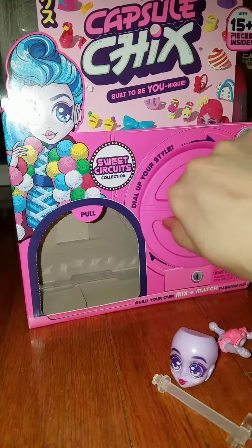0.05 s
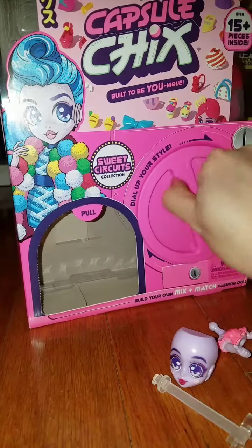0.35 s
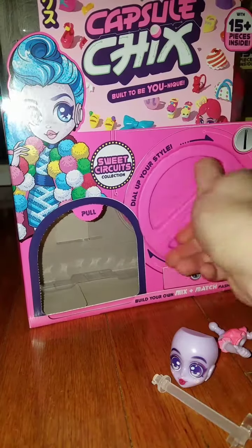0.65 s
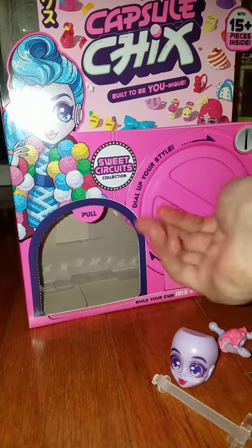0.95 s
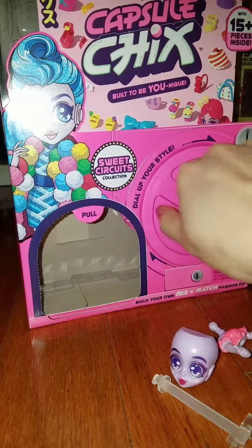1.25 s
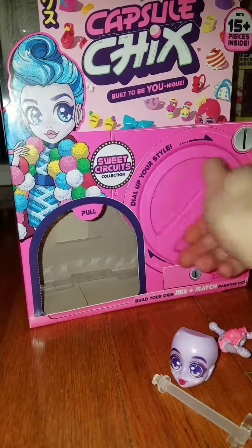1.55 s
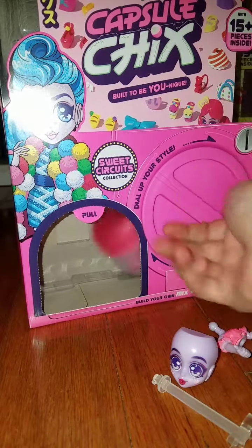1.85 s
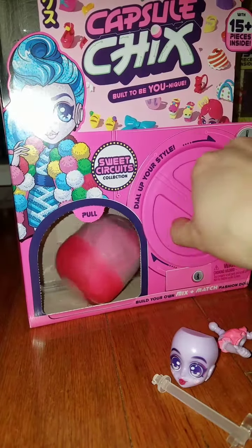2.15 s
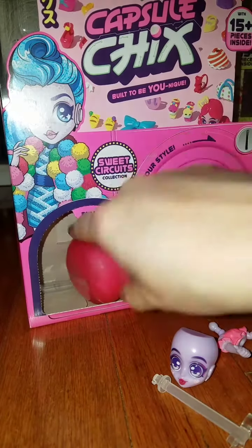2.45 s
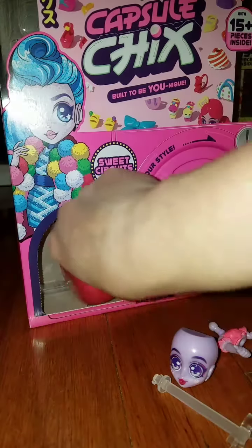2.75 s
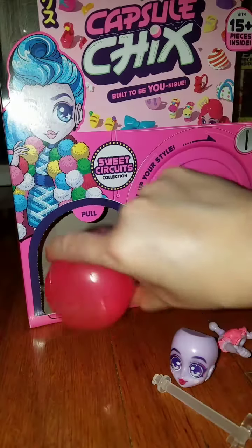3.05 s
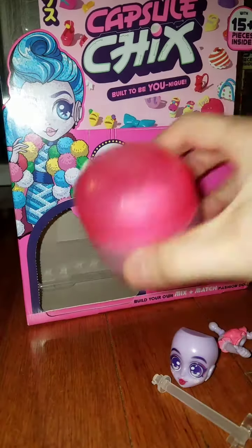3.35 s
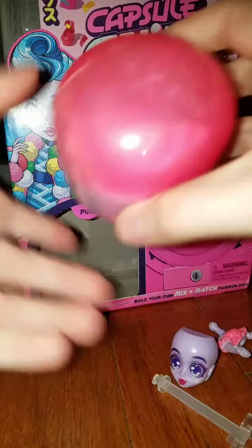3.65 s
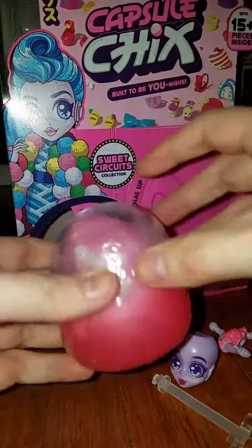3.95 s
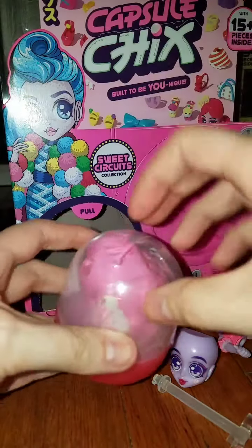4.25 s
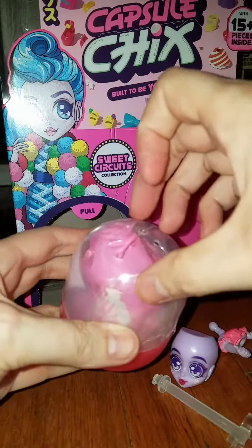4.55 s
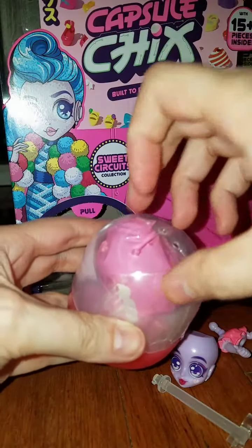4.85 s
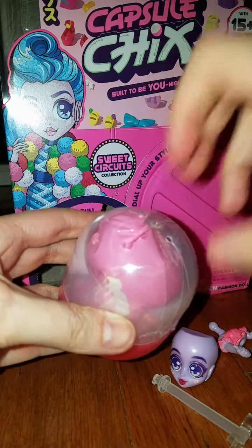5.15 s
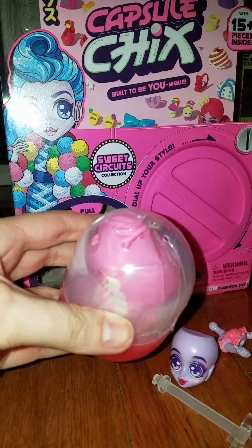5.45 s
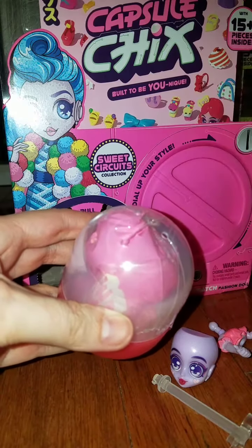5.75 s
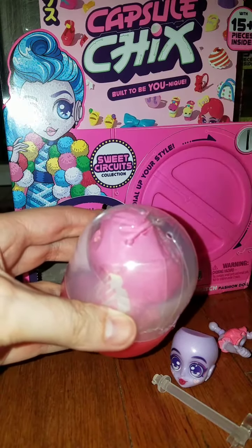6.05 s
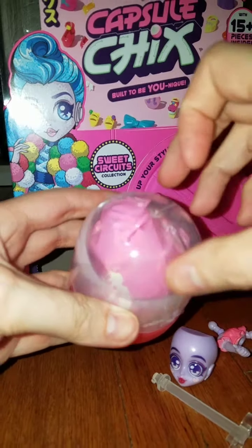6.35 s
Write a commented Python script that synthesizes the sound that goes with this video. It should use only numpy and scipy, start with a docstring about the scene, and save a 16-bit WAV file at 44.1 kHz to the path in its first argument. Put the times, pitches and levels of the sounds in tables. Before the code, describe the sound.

A plastic dial on a cardboard toy dispenser is twisted several times, scraping in its seat and ratcheting with uneven clicks. A capsule drops softly into the chute, then knocks and scrapes against the box as it is pulled out. Its shell ticks faintly under the fingers. Near the end something briefly bumps the microphone, which is close by in a small, quiet room.

```python
"""Toy capsule dispenser, close up

A plastic dial on a cardboard dispenser is twisted in four goes: it scrapes in its seat and ratchets
with uneven clicks. A capsule drops into the chute, knocks against the box as it is pulled out, and
ticks under the fingers. Small, quiet room; a close pair of microphones, the right one facing the
dial and brushed once near the end."""
import sys
import numpy as np
from scipy import signal
from scipy.fft import rfft, irfft, next_fast_len
from scipy.io import wavfile

SR = 44100
rng = np.random.default_rng(int(sys.argv[2]) if len(sys.argv) > 2 else 0)


def unload_wav(signal):
    """Save mono or channel-first audio to the path in sys.argv[1] as 16-bit WAV at rate SR, clipped to [-1, 1]."""
    wavfile.write(
        sys.argv[1],
        SR,
        np.round(np.clip(np.atleast_2d(signal).T, -1, 1) * 32767).astype(np.int16),
    )


N = 286631
TIME = np.arange(N) / SR

# ratchet clicks; weight is high when the whole box takes the blow:
# (time [s], strength [dB], weight [dB], sharpness [dB])
RATCHET_CLICKS = [(0.026, -33.5, -13.5, 2), (0.048, -36, -5, 0.5), (0.1975, -22, 2.5, 2.5),
                  (0.2195, -25.5, -3, 10), (0.264, -33.5, 0, -8), (0.316, -35.5, 6, 3.5),
                  (0.365, -26, -18, -6), (0.3866, -28.5, -19.5, 9), (0.4136, -21, -17, 5),
                  (0.439, -21, 1.5, -2.5), (0.607, -43, 6, 0), (0.6492, -19, 0, -6.5),
                  (0.691, -30, 3.5, -2), (0.895, -33, -8, -1.5), (1.0025, -30.5, -5.5, -2),
                  (1.03, -13, -3, -4.5), (1.1145, -19, -1.5, -3), (1.173, -33.5, 0, -7.5),
                  (1.265, -37.5, -11.5, 6.5), (1.398, -26.5, -9.5, 6.5), (1.5165, -27, -23, 0),
                  (1.526, -18.5, -6.5, 5), (1.564, -17, -20, 4), (1.607, -24.5, -13.5, -4),
                  (1.6392, -21, -17.5, -6), (1.6745, -21, -17.5, -3), (1.696, -19.5, -8.5, -6.5),
                  (1.702, -25, -9.5, -3), (1.789, -30, -8, -1)]
# the capsule against the box: (time [s], strength [dB], weight [dB], sharpness [dB])
CAPSULE_KNOCKS = [(1.886, -35.5, -15, -5), (1.973, -35, -6.5, 9), (2.213, -36, -5.5, 6.5),
                  (2.339, -42.5, -14, 7), (2.446, -19, -8, 0), (2.763, -43.5, -9.5, 3),
                  (2.883, -48.5, -3, 5.5), (2.9679, -21, 3, -1.5), (2.9965, -23, -11, 3),
                  (3.018, -22, 1, -2), (3.1663, -40, 4, -5), (3.188, -44.5, 7, -3), (3.241, -47, 6, -15)]
# scrapes of the dial, then the capsule: (middle [s], length [s], strength [dB], brightness [dB])
SCRAPE_STROKES = [(0.031, .1, -46.5, -1.5), (0.117, 0.074, -35.5, -1.5), (0.196, 0.078, -31.5, 3),
                  (0.369, 0.27, -38.5, 0.5), (0.558, 0.066, -32, 3), (0.782, 0.089, -31, 1),
                  (0.883, 0.14, -38, -1), (0.965, 0.044, -32, -4), (1.276, 0.051, -36, -0.5),
                  (1.396, 0.094, -30, 1.5), (1.564, 0.26, -30.5, 0.5), (1.779, .17, -33.5, -2.5),
                  (1.969, 0.14, -40, -0.5), (2.067, .035, -40, 2), (2.222, 0.15, -40.5, 0),
                  (2.399, 0.15, -36.5, -3.5), (2.49, .11, -38, -3), (2.648, 0.042, -38, 0),
                  (2.781, 0.23, -48, -1), (2.941, 0.082, -37, 2), (3.23, .14, -45, 0.5)]
# modes of box and dial: (frequency [Hz], level [dB], t60 [s])
BOX_MODES = [(106, -9.5, .09), (164.8, -4.5, .06), (225.6, 0.5, 0.089), (305, -3.5, 0.024),
             (435.6, -3.5, 0.067), (630, -0.5, 0.019), (770, -1, 0.025), (900, -2.5, 0.006),
             (1118, -1.5, 0.043), (1330, -2.5, 0.014), (1650, -2.5, 0.008), (2437, -.5, 0.013),
             (2586, -5.5, 0.015), (2929, -11.5, 0.037), (4970, -10.5, 0.011), (5340, -13, 0.0089),
             (7900, -12, 0.0064), (11800, -27, 0.011), (13100, -29.5, .005)]
# bounds of the five registers thump, knock, clack, snap and tick: (edge [Hz])
REGISTER_EDGES = [60, 330, 700, 1600, 5500, 16000]
# image at the microphone pair: (frequency [Hz], coherence [ratio], left minus right [dB])
MIC_PAIR = [(80, 0.91, -2.3), (180, 0.99, -1.5), (350, 0.8, -5.5), (560, 0.74, -1), (783, 0.78, -2),
            (1340, 0.086, -5.5), (2700, .12, -9.5), (5360, 0.028, -7), (9400, .03, -2), (13630, 0.25, -3.5)]


def from_db(db):
    """Decibels to gain."""
    return 10 ** (np.asarray(db) / 20)


def rms(x):
    """Root mean square."""
    return np.sqrt(np.mean(x ** 2) + 1e-20)


def at_hz(table, hz, column=1):
    """Reads a column of a table on a log-frequency axis."""
    table = np.array(table)
    return np.interp(np.log(hz), np.log(table[:, 0]), table[:, column])


def band(x, low, high):
    """Causal band-pass."""
    return signal.sosfilt(signal.butter(2, [low, high], "band", fs=SR, output="sos"), x)


def cut(x, hz, kind):
    """Gentle high- or low-pass."""
    return signal.sosfilt(signal.butter(2, hz, kind, fs=SR, output="sos"), x)


def drift(rate_hz):
    """A line wandering between random points of spread 1."""
    knots = rng.standard_normal(int(N / SR * rate_hz) + 2)
    return np.interp(TIME * rate_hz, np.arange(len(knots)), knots)


def swell(middle, half_length, t=TIME):
    """A stroke speeds up and slows down smoothly."""
    return np.exp(-np.minimum(((t - middle) / half_length) ** 2, 50) / 2)


def add(out, s, sound):
    """Mixes a sound in at time s."""
    at = max(round(s * SR), 0)
    out[:, at:at + sound.shape[1]] += sound[:, :N - at]


def noise(spectrum, lean=1, size=N):
    """Third-octave noise, alike at both microphones in the bass; lean pulls it to the right."""
    edges = np.geomspace(25, 17000, 29)
    white, out = rng.standard_normal((2, 2, size)), 0
    for k, (low, high) in enumerate(zip(edges, edges[1:])):
        hz = np.sqrt(low * high)
        if hz < spectrum[0][0] / 2:
            continue
        alike = at_hz(MIC_PAIR, hz)
        to_mics = np.sqrt([1 + alike, 1 - alike]) * [[1, 1], [1, -1]]   # mid, side to left, right
        pan_db = lean * at_hz(MIC_PAIR, hz, column=2) * np.array([[.5], [-.5]])
        out += (from_db(at_hz(spectrum, hz) + pan_db) * to_mics) @ band(white[k % 2], low, high)
    return out / rms(out.mean(0))


def recolour(x, gains_db):
    """Tone control with one gain for each register and smooth steps between them."""
    size = 2 * x.shape[1]
    hz = np.maximum(np.fft.rfftfreq(size, 1 / SR), 1)
    ranges = zip(REGISTER_EDGES, REGISTER_EDGES[1:])
    corners = np.ravel([(low * 2 ** .25, high / 2 ** .25) for low, high in ranges])
    curve_db = np.interp(np.log(hz), np.log(corners), np.repeat(gains_db, 2))
    cepstrum = irfft(np.log(from_db(curve_db)))
    cepstrum[1:size // 2] *= 2   # minimum phase: nothing sounds early
    cepstrum[size // 2 + 1:] = 0
    return irfft(rfft(x, size) * np.exp(rfft(cepstrum)))[:, :size // 2]


def ringing(modes, t, scatter_db):
    """Damped modes, each struck with its own strength and reaching the microphones out of step."""
    hz, level_db, t60 = np.transpose(modes)
    strength, detune, way = rng.standard_normal((3, len(hz)))
    swing = from_db((level_db + scatter_db * strength)[:, None] - 60 * t / t60[:, None])
    phase = 2 * np.pi * (hz * (1 + .032 * detune))[:, None] * t
    skew = (np.arccos(at_hz(MIC_PAIR, hz)) * np.sign(way))[:, None]
    pan_db = at_hz(MIC_PAIR, hz, column=2)[:, None]
    return -np.array([(swing * from_db(side * pan_db) * np.sin(phase + side * skew)).sum(0)
                      for side in (.5, -.5)])


def blows(contacts, modes, colour_db, heft_db, chatter_s, chatter, panel_db, panel_t60, damping,
          scatter_db):
    """Each contact grinds for a few ms and rings the modes and the panels."""
    # the crowd of weak panel modes: (frequency [Hz], density [dB])
    panel_spectrum = [(50, -12.5), (110, -1.5), (220, 8), (310, -1), (450, 3), (800, 1), (1150, 3),
                      (2000, -10.5), (2500, -8), (3800, -16), (4800, -9.5), (6600, -31), (8000, -21.5),
                      (10000, -26), (15000, -19.5)]
    # what each register takes of a blow's weight, mostly the low ones: (share [ratio])
    weight_share = [0.77, 1, 0, 0, 0.17]
    # what each register takes of its sharpness, mostly the high ones: (share [ratio])
    sharp_share = [0.053, 0, 0, 1, .95]
    crack_from_db, crack_share = -22.5, np.array([0, 0, 0.016, 0, 0.44])   # hard blows crack
    attack = int(.012 * SR)
    t, out = np.arange(next_fast_len(SR // 7, True)) / SR, np.zeros((2, N))
    ranges = list(zip(REGISTER_EDGES, REGISTER_EDGES[1:]))
    crowd = noise(panel_spectrum, size=2 * SR)
    crowds = [band(crowd, low, high) for low, high in ranges]
    t60s = [panel_t60 * (REGISTER_EDGES[2] / high) ** damping for _, high in ranges]   # highs die first
    fades = [from_db(panel_db - 60 * t / t60) for t60 in t60s]
    modes = np.array(modes, float)
    modes[0, 1] += heft_db   # the lowest mode: the whole body rocks
    for s, strength_db, weight_db, sharp_db in contacts:
        grind = rng.standard_normal(attack) * np.exp(-t[:attack] / chatter_s)
        force = signal.unit_impulse(attack) + chatter * grind / np.linalg.norm(grind)
        tone = signal.fftconvolve(ringing(modes, t, scatter_db), force[None])[:, :len(t)]
        starts = rng.integers(0, crowd.shape[1] - len(t), len(ranges))
        panels = sum(part[:, i:i + len(t)] * fade for part, i, fade in zip(crowds, starts, fades))
        hit = tone / rms(tone[:, :attack]) + panels
        hit *= from_db(22 * min(weight_db, 0) * t)   # a light contact rings shorter
        heads = [band(hit[:, :len(t) // 4], low, high) for low, high in ranges]
        natural_db = [20 * np.log10(max(rms(head[:, :attack]), np.sqrt(2) * rms(head)))
                      for head in heads]
        levels_db = strength_db + np.array(colour_db)
        levels_db += weight_db * np.array(weight_share) + sharp_db * np.array(sharp_share)
        levels_db += max(strength_db - crack_from_db, 0) * crack_share
        add(out, s, recolour(hit, levels_db - natural_db))
    return out


def stray_clicks():
    """Contacts for an edge that catches once in each stroke, light and sharp."""
    weight_db, sharp_db = -4, 7
    chance = np.clip(rng.standard_normal((len(SCRAPE_STROKES), 2)), -1, 1)
    return [(middle + place * length / np.pi, strength_db - 5 + 3.5 * size, weight_db, sharp_db)
            for (middle, length, strength_db, _), (place, size) in zip(SCRAPE_STROKES, chance)]


def dial_ratchet():
    """The ratchet and stray catching edges click and ring the box."""
    # a click's colour, thump to tick: (level over its strength [dB])
    click_colour = [-5.5, 0, -1.1, -5.5, -15.5]
    return blows(RATCHET_CLICKS + stray_clicks(), BOX_MODES, click_colour, heft_db=-1, chatter_s=0.0058,
                 chatter=1.5, panel_db=-7, panel_t60=0.1, damping=0.24, scatter_db=4.5)


def slips(contacts, lag_s=0.0198, length_s=0.067, level_db=-12.5, bright_db=-2.5):
    """Strokes for the part slipping on after each blow, louder the heavier the blow."""
    return [(s + lag_s, length_s, strength_db + weight_db + level_db, bright_db)
            for s, strength_db, weight_db, _ in contacts]


def stroke_power(strokes, hop=16):
    """Power of box grumble, rasp and hiss over time, summed over the strokes."""
    balance_db, bright_share = np.array([-2, -8.5, -14]), np.array([0, 1, 2.2])
    power = 0
    for middle, length, strength_db, bright_db in strokes:
        levels_db = strength_db + balance_db + bright_db * bright_share
        power += (from_db(levels_db)[:, None] * swell(middle, length / np.pi, TIME[::hop])) ** 2
    return np.repeat(power, hop, axis=1)[:, :N]


def scraping(strokes, grain_db, judder_db, catches_per_s, catch_db):
    """Plastic drags over card: grainy hiss and rasp with tiny catches, and a judder in the box."""
    # plastic on card: (frequency [Hz], density [dB])
    friction_spectrum = [(80, -2), (220, 3), (320, -6), (700, -4.5), (1250, -1.5), (2050, -14), (2700, 0),
                         (3600, -13.5), (5000, -6), (7000, -17), (8100, -4), (9400, -18.5), (12500, -10),
                         (16000, -18)]
    friction, power, out = noise(friction_spectrum), stroke_power(strokes), 0
    catches = (rng.random(N) < catches_per_s / SR) * rng.random(N)
    catches = signal.lfilter([1], [1, -np.exp(-1 / (0.00065 * SR))], catches + 1e-18)
    grain = from_db(grain_db * drift(1100)) * (1 + from_db(catch_db) * catches)
    judder = from_db(judder_db * drift(110))
    edges = [REGISTER_EDGES[0]] + REGISTER_EDGES[3:]
    size = next_fast_len(N)
    spectrum, log_hz = rfft(friction, size), np.log(np.fft.rfftfreq(size, 1 / SR) + 1)
    for k, texture in enumerate([judder, grain, grain]):   # grumble, rasp, hiss
        share = np.interp(log_hz, np.log([1100, 2900, 8000]), np.arange(3) == k)
        layer = irfft(spectrum * share, size)[:, :N] / rms(band(friction, edges[k], edges[k + 1]))
        out += np.sqrt(power[k]) * layer * texture / rms(texture)
    return out


def capsule_knocks():
    """The capsule bumps the card and rocks the whole box."""
    # a knock's colour, thump to tick: (level over its strength [dB])
    knock_colour = [-1, 1, -0.3, -5, -12]
    return blows(CAPSULE_KNOCKS, BOX_MODES, knock_colour, heft_db=5.5, chatter_s=0.0047,
                 chatter=1.0, panel_db=-4, panel_t60=0.094, damping=0.16, scatter_db=4.5)


def chute_air(x, hz, t60):
    """A sound in the chute, with the air inside ringing on after it."""
    r = from_db(-60 / (t60 * SR))
    return x + signal.lfilter([1 - r, 0, r - 1], [1, -2 * r * np.cos(2 * np.pi * hz / SR), r * r], x)


def finger_taps():
    """The capsule's shell ticks under the fingers."""
    # fingers on the capsule: (time [s], strength [dB], weight [dB], sharpness [dB])
    taps = [(3.365, -58, 0, 1.5), (3.5635, -47.5, -2, 8.5), (3.738, -60.5, 9.5, -6), (4.009, -45, -8.5, 7),
            (4.022, -63, -2, 14), (4.42, -69, -2, 8.5)]
    # modes of the shell: (frequency [Hz], level [dB], t60 [s])
    shell_modes = [(230, -10, .03), (560, -8, .014), (850, -3, .012), (1720, 0, .011), (1930, -1, .011),
                   (2600, -2, .008), (3250, -4, .008), (4700, -7, .005), (5600, -6, .005), (7800, -3, .004),
                   (12700, -14, .004)]
    # a tap's colour, thump to tick: (level over its strength [dB])
    tap_colour = [-3.5, 0.5, 1.5, -1, -4.5]
    return blows(taps, shell_modes, tap_colour, heft_db=-11, chatter_s=0.0035,
                 chatter=0.68, panel_db=-1.5, panel_t60=0.03, damping=0.14, scatter_db=8)


def finger_rubs(grain_db):
    """Skin whispers over the shell."""
    # fingers sliding: (middle [s], half-length [s], level [dB])
    slides = [(3.779, 0.032, -57), (4.072, 0.048, -65.5), (4.268, 0.068, -72.5)]
    # skin on smooth plastic: (frequency [Hz], density [dB])
    skin_spectrum = [(2000, -8.5), (3800, -7.5), (5500, -4.5), (6800, -10), (8000, 0), (9600, -9),
                     (11500, -1), (13200, -4), (16000, -7)]
    speed = sum(from_db(level_db) * swell(s, half_length) for s, half_length, level_db in slides)
    return noise(skin_spectrum) * speed * from_db(grain_db * drift(260))


def mic_brush(thud_hz, thud_t60, click_t60, left_db):
    """Handling noise: a finger pushes air into the right microphone's port and clicks on the case."""
    # touches of the finger: (time [s], thud [dB], click [dB])
    touches = [(5.619, -14, -44), (5.633, -17.5, -16.5), (5.675, -25.5, -62), (5.699, -50, -45.5),
               (5.705, -49, -43), (5.709, -36, -37.5)]
    t, out = np.arange(SR // 10) / SR, np.zeros((2, N))
    for s, thud_db, click_db in touches:
        thud = -np.sin(2 * np.pi * thud_hz * t) * from_db(thud_db - 60 * t / thud_t60)
        click = band(rng.standard_normal(len(t)) * from_db(-60 * t / click_t60), 960, 3930)
        click *= from_db(click_db) / rms(click[:SR // 1000]) / 2
        add(out, s, (cut(thud, hz=305, kind="low") + click) * from_db([[left_db], [0]]))
    return out


def room_echoes(x, near_db, near_t60, far_db, far_t60):
    """Quick echoes from box and floor, then the soft tail of the small room."""
    # reflected sound: (frequency [Hz], density [dB])
    echo_spectrum = [(60, 2.5), (600, -2), (1500, -5.5), (2800, -2), (4000, -1.5), (16000, -2.5)]
    t, tail = np.arange(SR // 2) / SR, 0
    diffuse = noise(echo_spectrum, lean=0, size=len(t))
    for level_db, t60 in ((near_db, near_t60), (far_db, far_t60)):
        fade = from_db(-60 * t / t60) * np.clip(t / 0.02, 0, 1)
        tail += from_db(level_db) * fade / np.linalg.norm(fade)
    return signal.fftconvolve(x, diffuse * tail, axes=1)[:, :N]


def room_tone(level_db):
    """The quiet room's steady, low background."""
    # room tone: (frequency [Hz], density [dB])
    air_spectrum = [(15, -41), (25, -9.5), (59, -3.5), (87, -3.5), (120, 0.5), (149, -11), (236, -1.5),
                    (363, -20), (463, -13), (516, -29), (641, -8), (936, -22), (1940, -25), (2410, -28),
                    (16000, -38)]
    return from_db(level_db) * noise(air_spectrum, lean=.7)


def scene():
    """Dial, capsule and fingers, close to the microphones in the small room."""
    dial = dial_ratchet()
    capsule = chute_air(capsule_knocks(), hz=443, t60=.085)
    taps = finger_taps()
    strokes = SCRAPE_STROKES + slips(RATCHET_CLICKS + CAPSULE_KNOCKS)
    scrape = scraping(strokes, grain_db=2.5, judder_db=4.5, catches_per_s=90, catch_db=7.5)
    in_chute = np.interp(TIME, [1.95, 2.45], [0, 1])   # the scraping passes from dial to capsule
    chute = cut(capsule + scrape * in_chute, hz=14000, kind="low")   # card softens the top
    box = dial + scrape * (1 - in_chute) + chute
    box = cut(box, hz=64, kind="high")   # a small box radiates no deep bass
    direct = box + taps + finger_rubs(grain_db=5)
    echoes = room_echoes(direct, near_db=-18.5, near_t60=0.047, far_db=-22, far_t60=0.32)
    handling = mic_brush(thud_hz=106, thud_t60=0.012, click_t60=0.013, left_db=-33)
    return direct + echoes + handling + room_tone(level_db=-58)


def record(dry):
    """The recorder rounds the highest peaks and cuts steeply above 16 kHz."""
    rounded = 1.2 * np.tanh(dry / 1.2)
    return signal.sosfilt(signal.ellip(10, .1, 80, 16000, fs=SR, output="sos"), rounded)


dry = scene()
out = record(dry)
unload_wav(out)
```